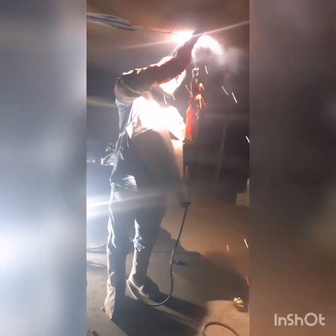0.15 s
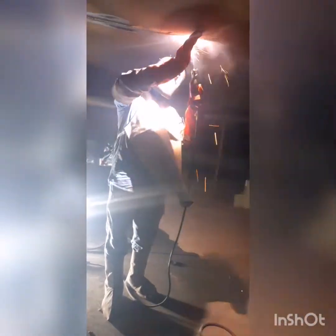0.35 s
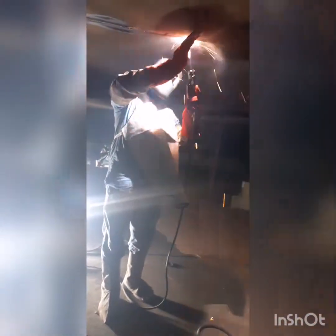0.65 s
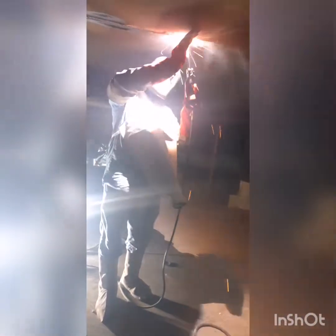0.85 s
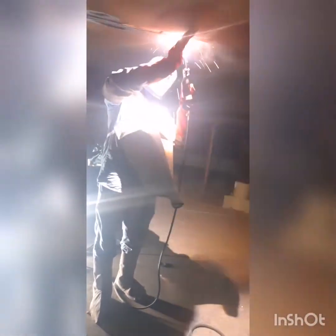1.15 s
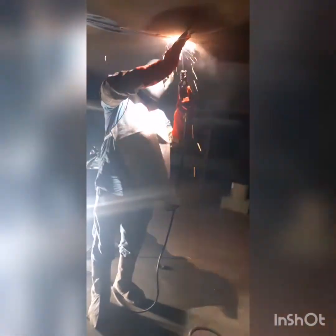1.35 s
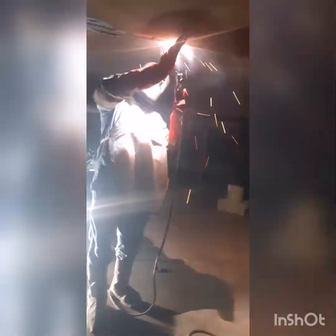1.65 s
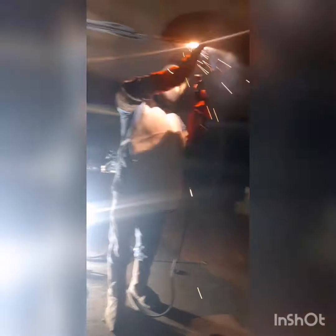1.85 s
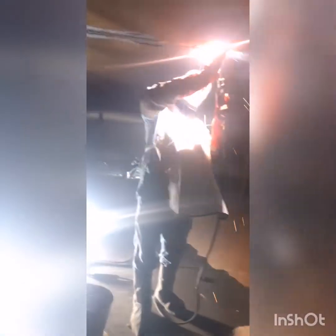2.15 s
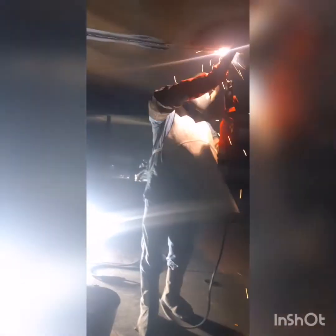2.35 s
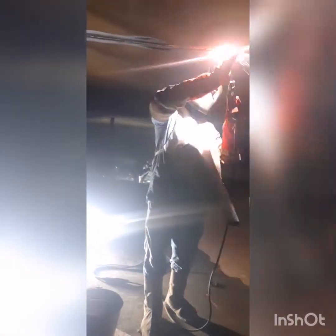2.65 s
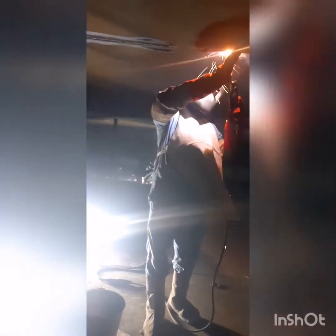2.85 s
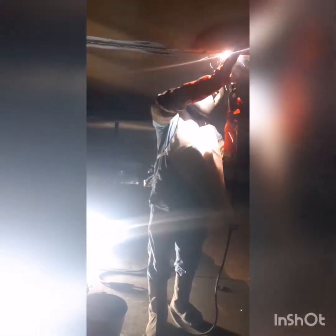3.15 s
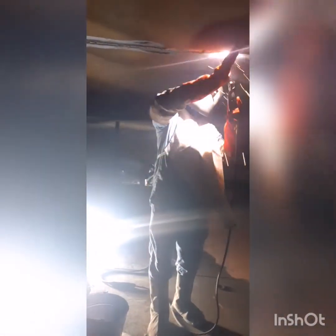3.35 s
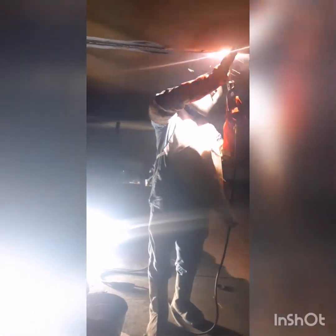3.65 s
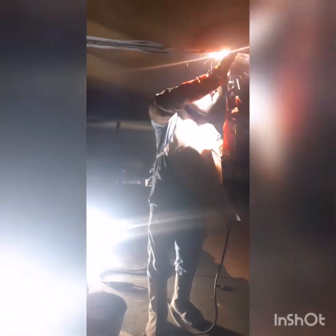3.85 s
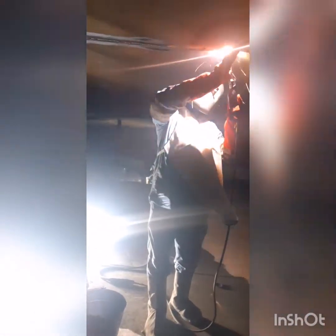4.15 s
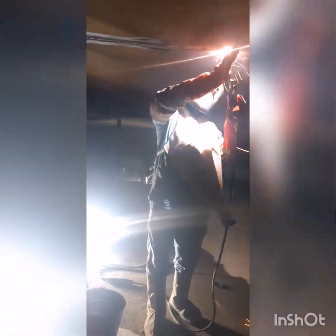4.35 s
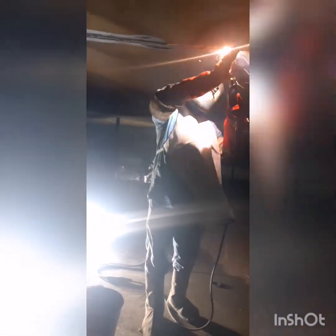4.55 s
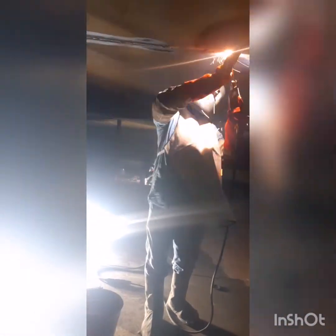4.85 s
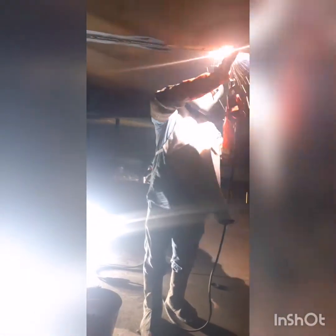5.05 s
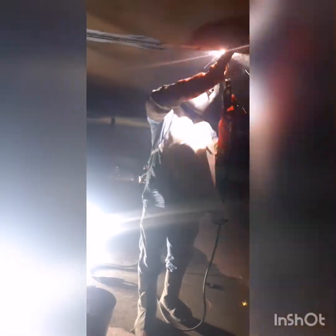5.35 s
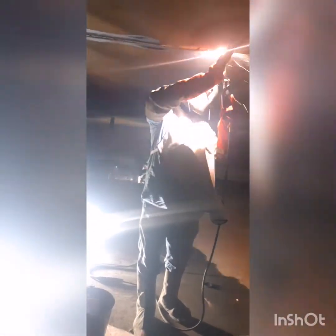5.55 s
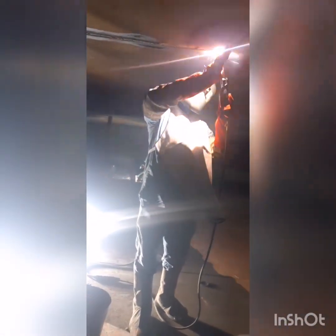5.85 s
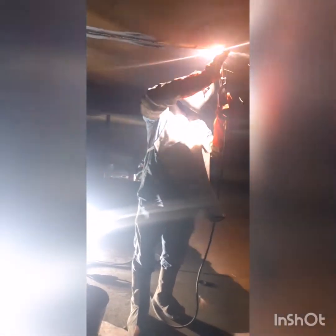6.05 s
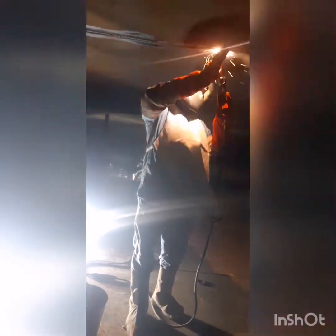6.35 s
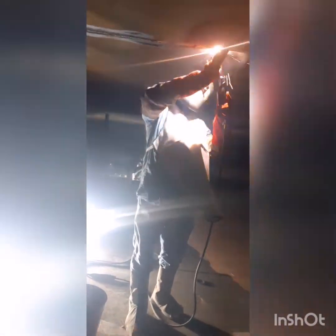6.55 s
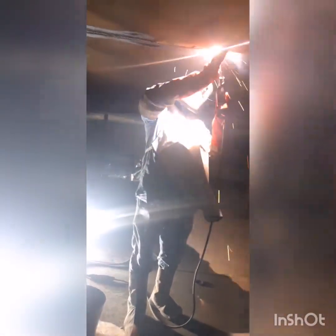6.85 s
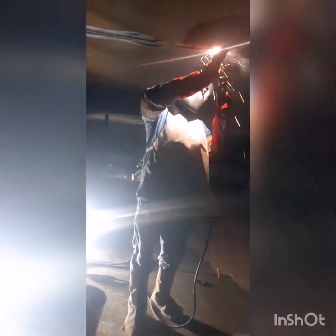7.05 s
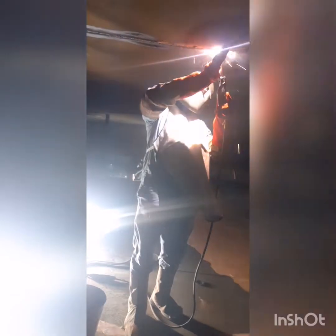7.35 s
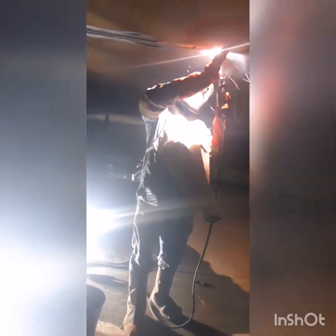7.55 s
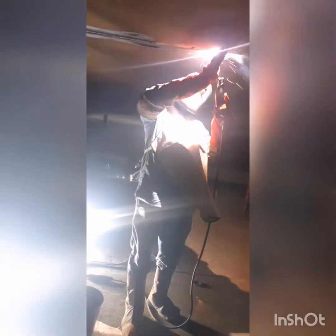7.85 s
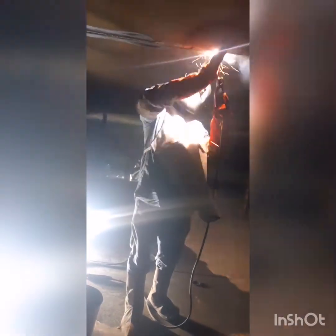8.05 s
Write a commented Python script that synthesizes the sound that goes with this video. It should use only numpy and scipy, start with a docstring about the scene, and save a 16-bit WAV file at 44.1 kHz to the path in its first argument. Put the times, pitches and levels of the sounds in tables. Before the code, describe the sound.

A welding arc burns without pause for about 8.2 seconds in a reverberant steel compartment. From 0 to 1.7 s it fries steadily, random crackles centred in the mids with moderate hiss and fine fizz, over hollow low boom, rumble and a wavering machine hum and drone. Around 1.75 to 2.1 s it flares, hiss surging with sharp spits, then eases. At 2.6 to 2.8 s more spits and a piercing edge lead into strong, bright hissing until about 6 s, while the low boom recedes. Pronounced spits strike near 4.56, 4.93, 5.46 and 5.73 s. After 6.1 s the hiss shrinks, leaving thinner crackling with brief flares. Tiny high whistling squeaks chirp faintly at 6.87 s, then more clearly near 7.25, 7.55 and 7.9 s, as boom and drone return slightly. Droplet pops scatter throughout; the stereo image is close yet diffuse.

```python
"""A welding arc fries in a steel compartment: random pressure snaps, echoed by the walls and coloured.
Its gas jet is denser snaps, hissing up as the arc is drawn out; fine fizz and droplet pops join in.
Bursting drops spit as noise puffs; the molten pool squeaks as short whistles over noisy partials.
Noise through low resonances makes the steel boom, over rumble and air; wavering sines are a machine.
Two closely spaced microphones hear it, mostly as a diffuse wash."""
import sys
import numpy as np
from scipy import signal
from scipy.fft import rfft, irfft, next_fast_len
from scipy.io import wavfile
from scipy.ndimage import uniform_filter1d, map_coordinates

SR = 44100
rng = np.random.default_rng(int(sys.argv[2]) if len(sys.argv) > 2 else 0)


def write(x):
    x = np.atleast_2d(x).T
    wavfile.write(sys.argv[1], SR, np.round(np.clip(x, -1, 1) * 32767).astype(np.int16))

N = 362061

# Half widths are where a resonance's gain has halved. Levels are relative: sources add offsets.
# molten pool: start_s, frying_level_db
POOL_LEVEL = [(0.0, -30), (1.6, -28), (1.85, -27.5), (2.2, -29), (2.6, -30.5), (2.75, -30), (3.2, -32),
              (3.65, -33), (4.1, -34.5), (4.46, -31.5), (4.55, -31.5), (5.1, -31.5), (5.7, -29.5),
              (6.2, -34), (6.36, -31), (6.55, -33.5), (7.0, -34.5), (7.9, -30.5), (8.21, -31)]
# frying spectrum: freq_hz, density_db
FRYING_SPECTRUM = [(300, -26), (600, -11), (900, -9), (1130, 0.5), (1400, -1), (1700, -1), (2100, -5),
                   (2700, -9), (4000, -9.5), (7400, -18), (9000, -22.5)]
# gas jet, grows as the arc is drawn out, sinks as it is shortened: start_s, level_db
JET_LEVEL = [(0, -23.5), (1.15, -24), (1.74, -21.5), (1.98, -18), (2.17, -21), (2.62, -21.5), (2.82, -15),
             (3.35, -16), (3.7, -17), (4.03, -15.5), (4.5, -17), (4.75, -15.5), (4.88, -17), (5.05, -16),
             (5.45, -16), (5.8, -17), (6.1, -20.5), (6.36, -20.5), (6.52, -24.5), (6.75, -28.5), (7.1, -30),
             (7.65, -25.5), (8.21, -25.5)]
# jet spectrum: freq_hz, density_db
JET_SPECTRUM = [(700, -40), (1400, -7.5), (2000, -6), (2600, -4), (3400, -0.5), (4350, -1), (5300, -1),
                (6300, -2), (7300, -3.2), (8000, -7), (8800, -13), (11000, -14.5), (15700, -33)]
# fine spark fizz, choked while the arc is short: start_s, level_db
FIZZ_LEVEL = [(0, -23), (1.2, -23.5), (1.95, -20.5), (2.2, -24), (2.6, -22), (2.85, -20), (4.0, -19.5),
              (4.45, -23), (4.92, -24.5), (5.1, -19.5), (5.8, -21.5), (6.08, -25), (6.3, -20), (6.5, -29),
              (7.12, -27.5), (7.45, -25.8), (8.21, -23)]
# fizz spectrum: freq_hz, density_db
FIZZ_SPECTRUM = [(2000, -18), (5000, -1.5), (7500, 1.5), (8700, -3), (9600, -3), (10700, 1), (12200, 0.5),
                 (14000, -1), (15700, -4)]
# sudden flare-ups: start_s, release_after_s, jet_lift_db, fizz_lift_db
FLARES = [(0.588, 0.11, 2.5, 0), (1.75, .05, 4, 1), (1.877, 0.12, 1, 2.5), (2.633, 0.15, 0, 5),
          (3.03, 0.2, 0.5, 0.5), (3.44, 0.11, 2, 0.5), (3.683, 0.035, 0.5, -2), (4.549, 0.26, 1, 3.5),
          (4.998, 0.22, 2, -1), (5.562, 0.24, 1, .7), (5.882, 0.031, 2.5, 4), (6.267, .1, 1.2, 0),
          (6.865, .03, 4.5, 5.5), (7.213, 0.11, 2, 4), (7.523, 0.067, 1.5, 5), (7.86, 0.075, 2.5, 4)]
# hiss bands that stand out by turns: centre_hz, half_width_hz
JET_BANDS = [(2900, 1100), (4400, 510), (7080, 300)]
# band levels against the jet: start_s, hollow_db, bright_db, piercing_db
JET_BAND_LEVELS = [(0, -5.5, -7, -24), (.65, -2, -11, -24), (1.6, -7, -20, -24), (1.88, -9, -13, -24),
                   (1.985, 2, -9, -22), (2.06, -2, -11, -22), (2.2, -12, -11, -24), (2.62, -14, -16, -22),
                   (2.69, -16, -12, -5), (2.78, -9, -7, -9), (2.95, -4.5, -11, -20), (3.25, -6, -8, -22),
                   (3.5, -11, -8, -22), (3.7, -9, -11, -22), (4.35, -11, -8, -16), (4.75, -7, -17, -13),
                   (4.93, -11, -5, -24), (5.1, -14, -8, -9), (5.3, -13, -9, -18), (5.7, -12, -4, -22),
                   (6.15, -19, -16, -15), (7.47, -8, -15, -24), (7.495, 4.5, -16, -24),
                   (7.65, -10.5, -22, -24), (8.21, -14, -20, -24)]
# steel plate resonances: centre_hz, half_width_hz, lift_db (width is of the dB curve)
PLATE_MODES = [(1334, 27, 3), (2120, 6.5, 1.5), (2600, 31, 2), (2990, 18, 2.5), (3960, 19, 3.5),
               (4200, 8.3, 6), (4700, 11, 2.5), (7050, 82, 0), (7830, 14, 0.5)]
# stereo difference; standing waves reach both microphones alike: freq_hz, side_gain_db
SIDE_SPECTRUM = [(30, 12), (80, 6), (150, -8), (300, -6), (600, -1), (1000, 0)]
# compartment resonances: centre_hz, half_width_hz, level_db
HOLLOW_MODES = [(252.3, 18.8, 3), (280, 32, -3.5), (352.5, 20.7, 0), (654, 59, -8.5), (683, 22, 1.5),
                (1314, 30, -0.5)]
# ringing of the hollow: start_s, level_db
BOOM_LEVEL = [(0, -37), (.12, -32), (.42, -34), (.53, -34), (.7, -31.5), (1.8, -32), (2.22, -34.5),
              (2.6, -33), (3, -43), (3.68, -43), (3.85, -39.5), (5.7, -41), (5.95, -45), (6.6, -40.5),
              (7.3, -39), (7.6, -41), (7.88, -31), (8.21, -37)]
# broad rumble: start_s, level_db
RUMBLE_LEVEL = [(0, -36.5), (.8, -38.5), (1.42, -36), (2.05, -35), (2.3, -37), (2.7, -37.5), (3.1, -44),
                (3.65, -44), (4.1, -47), (4.6, -41.5), (5.45, -41.5), (5.72, -40), (6.15, -45), (6.4, -42),
                (6.7, -43), (7.3, -42.5), (8.05, -40), (8.21, -41)]
# rumble spectrum: freq_hz, density_db
RUMBLE_SPECTRUM = [(60, -21), (90, -19), (125, -5.5), (200, -5), (300, 1.5), (450, -3.5), (650, 1.5),
                   (900, -4.5), (1500, -35)]
# machine hum: start_s, level_db
HUM_LEVEL = [(0, -50), (.22, -44.5), (.45, -56), (.72, -60), (.98, -51), (1.17, -62), (1.33, -39.5),
             (1.48, -46), (1.6, -38.5), (1.78, -35), (1.9, -42), (2.03, -40), (2.2, -47.5), (2.43, -37),
             (2.72, -42), (2.95, -54), (3.45, -51.5), (4.05, -55.5), (4.55, -46), (5.7, -45.5), (5.9, -48),
             (6.3, -46), (6.47, -50), (6.6, -44), (6.77, -54), (6.97, -46), (7.6, -42.5), (7.85, -46),
             (8.21, -41)]
# slow drift of the machine's tones: start_s, hum_hz, lower_drone_hz, upper_drone_hz
MACHINE_PITCH = [(0, 159, 332, 700), (1.3, 158, 335.4, 708), (3.2, 159.5, 330.3, 694),
                 (4.6, 160.6, 340.7, 692.6), (8.21, 163.2, 344, 698)]
# machine drone: start_s, lower_level_db, upper_level_db
DRONE_LEVEL = [(0, -35.5, -35), (.15, -32, -39), (.35, -37, -53), (.8, -35, -35.5), (1.42, -38.5, -33.5),
               (1.7, -33, -43), (2.2, -42, -39), (2.6, -34.5, -49), (3.1, -40.5, -54), (3.65, -49, -55),
               (3.95, -43.5, -48), (4.7, -47, -48), (5.7, -48, -45), (6.6, -49, -44.5), (7.3, -43.5, -40),
               (7.95, -42, -39), (8.21, -39, -36)]
# low rush of air: start_s, level_db
AIR_LEVEL = [(0, -54), (2.2, -51), (3, -56), (4.6, -54), (5.4, -52), (5.9, -58), (7.3, -60), (8.21, -52)]
# air spectrum: freq_hz, density_db
AIR_SPECTRUM = [(20, -16), (50, -6), (90, -2), (130, 6), (400, 0), (1000, -37)]
# bursting metal drops: start_s, level_db
SPITS = [(0.6494, -12), (1.058, -10), (1.7679, -8), (1.9594, -6), (2.0644, -3), (2.6838, -3), (2.7194, -5),
         (2.7694, -9), (3.1602, -7), (3.2106, -8), (3.4484, -7), (4.5634, -1), (4.935, -3), (4.9944, -11),
         (5.251, -8), (5.458, -1), (5.7309, -4), (6.1664, -9), (7.4899, -15), (7.854, -7)]
# gas squeaking out of the pool: start_s, length_s, pitch_hz, whistle_level_db, partials_level_db
SQUEAKS = [(6.874, .016, 7150, -35, -31), (7.227, .008, 6000, -20, -24), (7.241, .004, 4250, -23, -26),
           (7.257, .008, 5880, -19, -22), (7.288, .006, 6080, -23, -27), (7.526, .009, 6000, -26, -32),
           (7.54, 0.012, 6020, -21.5, -22), (7.558, .017, 6020, -21, -23), (7.595, .006, 6080, -22, -26),
           (7.869, .01, 6000, -23, -19), (7.89, .006, 5920, -22, -18), (7.898, .008, 3780, -24, -22),
           (7.911, .007, 6650, -23, -22)]
# partials shared by all squeaks: freq_hz, level_db
SQUEAK_PARTIALS = [(2870, -6), (3600, -2), (4100, -4), (4700, -12), (5300, -1), (5650, -2), (6000, 2),
                   (6700, 0), (7050, -1), (8100, 1), (10700, -5)]

MIC_DELAY_S = .00046  # travel time between the microphones
TOP_HZ = 15760
FLARE_ATTACK_S, FLARE_RELEASE_S = 0.018, .035  # release: time constant
PARTIAL_HALF_WIDTH_HZ, WHISTLE_LINEWIDTH_HZ = 110, 91
SQUEAK_ATTACK_S, SQUEAK_RELEASE_S = .0015, .003  # release: time constant
SQUEAK_ECHO_DB, SQUEAK_ECHO_T60_S = -11, 0.26


def amp(db):
    """Decibels to gain."""
    return 10 ** (np.asarray(db) / 20)


def unit(x):
    """Scale to rms 1."""
    return x / np.sqrt(np.mean(x ** 2) + 1e-20)


def along(points, hz):
    """(Hz, value) points read on a log axis."""
    point_hz, value = np.transpose(points)
    return np.interp(np.log(hz + 1), np.log(point_hz + 1), value)


def curves(rows):
    """One value per sample for each column after the time."""
    time_s, *columns = np.transpose(rows)
    return [np.interp(np.arange(N) / SR, time_s, column) for column in columns]


def wobble(knots_per_s):
    """Smooth random curve."""
    knots = rng.standard_normal(int(N * knots_per_s / SR) + 4)
    return map_coordinates(knots, [np.arange(N) * knots_per_s / SR])


def filtered(x, response):
    """x times a response of frequency."""
    size = next_fast_len(N + SR // 2)
    return irfft(rfft(x, size) * response(np.fft.rfftfreq(size, 1 / SR)), size)[..., :N]


def coloured(x, spectrum):
    """x shaped by a spectrum that falls away below its first point."""
    return filtered(x, lambda hz: amp(along(spectrum, hz)) * np.minimum(hz / spectrum[0][0], 1) ** 2)


def band(hz, centre_hz, half_width_hz):
    """Gain of one resonance, 1 at its centre."""
    return 1 / (1 + ((hz - centre_hz) / half_width_hz) ** 2)


def narrow(response):
    """Unrelated noise at each microphone through a response; rms 1."""
    return unit(filtered(rng.standard_normal((2, N)), response))


def diffuse(pair):
    """Sound from all sides: microphones agree mainly on waves longer than their spacing."""
    def mid_side_gain(hz):
        alike = .98 * np.sinc(2 * hz * MIC_DELAY_S)
        side_power = amp(along(SIDE_SPECTRUM, hz)) ** 2
        return np.sqrt([1 + alike, (1 - alike) * side_power])

    mid, side = filtered(pair, mid_side_gain)
    return np.array([mid + side, mid - side]) / np.sqrt(2)


def compartment(x, direct_db, tail_db, early_t60_s, tail_t60_s):
    """Reflections turn snaps into dying noise: a flurry off the near plates, then a longer tail."""
    t = np.arange(SR // 2) / SR
    flurry = amp(-60 * t / early_t60_s) ** 2
    tail = amp(-60 * t / tail_t60_s) ** 2
    decay = flurry / flurry.sum() + amp(tail_db) ** 2 * tail / tail.sum()
    power = np.abs(signal.fftconvolve(x ** 2, decay / decay.sum())[:N])
    wet = diffuse(np.sqrt(power) * rng.standard_normal((2, N)))
    lag = int(MIC_DELAY_S * SR * .9)  # the arc is overhead, nearer to one microphone
    direct = np.array([x, np.pad(x, (lag, 0))[:N]])
    return (wet + amp(direct_db) * direct) / np.sqrt(1 + amp(direct_db) ** 2)


def shifting(pair, depth_db, size):
    """Reflections reinforce and cancel frequencies, differently as the welder and hot air move."""
    spectrum = signal.stft(pair, SR, nperseg=1024)[2]
    shared = rng.standard_normal(spectrum.shape[1:])
    chance = shared + .5 * rng.standard_normal(spectrum.shape)
    bins, frames = size
    field = uniform_filter1d(uniform_filter1d(chance, bins, axis=1), frames, axis=2)
    gain = unit(amp(depth_db * unit(field)))
    return signal.istft(spectrum * gain, SR, nperseg=1024)[1][:, :N]


def sparks(rate_per_s, spread_db):
    """Random pressure snaps of scattered but bounded size; rms 1."""
    fires = rng.random(N) < rate_per_s / SR
    size = np.minimum(rng.standard_normal(N), 2)
    return unit(fires * np.sign(rng.standard_normal(N)) * amp(spread_db * size))


def spatter(rate_per_s, pitch_hz, cycles, spread_db):
    """Flying droplets pop all around as decaying sines of scattered pitch and life; rms 1."""
    times = np.flatnonzero(rng.random(N) < rate_per_s / SR)
    pitch, life, size, way = rng.standard_normal((4, len(times), 1))
    hz = pitch_hz * np.exp(np.tanh(.6 * pitch))
    n = np.arange(SR // 80)
    decay = np.exp(-n / SR * hz / (cycles * np.exp(0.58 * life)))
    pops = amp(spread_db * size) * np.sin(2 * np.pi * hz * n / SR) * decay
    lag = np.rint(np.tanh(way) * MIC_DELAY_S * SR / 2).astype(int)

    def heard(side):
        at = np.maximum(times[:, None] + n + side * lag, 0).ravel()
        return np.bincount(at, pops.ravel(), N)[:N]

    pair = np.array([heard(1), heard(-1)])
    return unit(filtered(pair, lambda f: np.minimum(f / 2000, 1) ** 3))  # small drops make no bass


def arc(jet_db, fizz_db):
    """Pool fries, gas hisses, droplets pop, sparks fizz; snaps flutter as drops cross the gap."""
    frying_db, = curves(POOL_LEVEL)
    flutter = wobble(90)
    snaps = sparks(rate_per_s=1600, spread_db=3) * amp(0.43 * flutter)
    frying = compartment(snaps, direct_db=-7.5, tail_db=0, early_t60_s=0.05, tail_t60_s=0.42)
    frying = shifting(frying, depth_db=1.36, size=(4, 3))
    gas = sparks(rate_per_s=12000, spread_db=3.5) * amp(0.45 * flutter + 1.7 * wobble(200))
    jet = compartment(gas, direct_db=-8.5, tail_db=8, early_t60_s=0.02, tail_t60_s=0.21)
    jet = shifting(jet, depth_db=2, size=(18, 2))
    ticks = sparks(rate_per_s=8000, spread_db=3) * amp(0.2 * flutter)
    fizz = compartment(ticks, direct_db=-16, tail_db=-9, early_t60_s=0.027, tail_t60_s=0.18)
    pops = spatter(rate_per_s=550, pitch_hz=3707, cycles=16.5, spread_db=3.0)
    return (amp(frying_db + 8.5) * unit(coloured(frying, FRYING_SPECTRUM))
            + amp(jet_db + 1.0) * unit(coloured(jet, JET_SPECTRUM))
            + amp((jet_db + frying_db) / 2 - 2.5) * pops
            + amp(fizz_db) * unit(coloured(fizz, FIZZ_SPECTRUM)))


def jet_ring(jet_db):
    """Hollow, bright and piercing noise bands of the jet stand out by turns and flicker."""
    out = np.zeros((2, N))
    for (hz, half_width_hz), band_db in zip(JET_BANDS, curves(JET_BAND_LEVELS)):
        hiss = narrow(lambda f: band(f, hz, half_width_hz) * np.minimum(f / 2100, 1) ** 4)
        out += amp(jet_db + band_db + 2.0 * wobble(35)) * hiss
    return out


def plates(pair):
    """The steel plates favour a few fixed pitches."""
    def lift(f):
        return amp(sum(db * band(f, hz, half_width_hz) for hz, half_width_hz, db in PLATE_MODES))

    return filtered(pair, lift)


def boom():
    """Noise keeps the steel hollow ringing at low resonances, over a broad, lumpy rumble."""
    def modes(f):
        return np.sqrt(sum((amp(db) * band(f, hz, half_width_hz)) ** 2
                           for hz, half_width_hz, db in HOLLOW_MODES))

    boom_db, = curves(BOOM_LEVEL)
    rumble_db, = curves(RUMBLE_LEVEL)
    ring = unit(diffuse(filtered(rng.standard_normal((2, N)), modes)))
    rumble = diffuse(coloured(rng.standard_normal((2, N)), RUMBLE_SPECTRUM))
    rumble = unit(shifting(rumble, depth_db=3.5, size=(3, 7)))
    return amp(boom_db - 1.0 + 1.66 * wobble(10)) * ring + amp(rumble_db + 0.47 * wobble(6.3)) * rumble


def tone(hz):
    """Sine of varying pitch; rms 1."""
    return unit(np.sin(2 * np.pi * np.cumsum(hz) / SR))


def machine():
    """A hum of nearly steady pitch under a two-tone drone that swells and flutters at random."""
    hum_db, = curves(HUM_LEVEL)
    hum_hz, *drone_hz = curves(MACHINE_PITCH)
    out = amp(hum_db - 2.0 + 1.1 * wobble(14)) * tone(hum_hz + 1.12 * wobble(9))
    for hz, db in zip(drone_hz, curves(DRONE_LEVEL)):
        out += amp(db - 4 + 3.6 * wobble(24)) * tone(hz + 7 * wobble(36))
    return out


def air_rush():
    """Low rush of air in the space: diffuse coloured noise."""
    air_db, = curves(AIR_LEVEL)
    air = unit(diffuse(coloured(rng.standard_normal((2, N)), AIR_SPECTRUM)))
    return amp(air_db + 3.9 * wobble(9.9)) * air


def flare(start_s, release_after_s):
    """Attack, hold and release of one flare-up, 0 to 1."""
    t = np.arange(N) / SR - start_s
    release = np.exp(-np.maximum(t - release_after_s, 0) / FLARE_RELEASE_S)
    return np.clip(t / FLARE_ATTACK_S, 0, 1) * release


def arc_levels():
    """Jet and fizz in dB, each briefly shifted by the flare-ups."""
    jet_db, = curves(JET_LEVEL)
    fizz_db, = curves(FIZZ_LEVEL)
    for start_s, release_after_s, jet_lift_db, fizz_lift_db in FLARES:
        shape = flare(start_s, release_after_s)
        jet_db = jet_db + jet_lift_db * shape
        fizz_db = fizz_db + fizz_lift_db * shape
    return jet_db, fizz_db


def spits():
    """Each bursting drop is a short sharp noise puff with the jet's colour."""
    puffs = np.zeros(N + SR)
    t = np.arange(SR // 8) / SR
    for start_s, db in SPITS:
        decay = amp(db + 0.5 - 60 * t / 0.035)  # 60 dB in 35 ms
        puffs[round(start_s * SR):][:len(t)] += decay * rng.standard_normal(len(t))
    echoed = compartment(puffs[:N], direct_db=-20, tail_db=-6, early_t60_s=.018, tail_t60_s=0.37)
    return coloured(echoed, JET_SPECTRUM)


def squeaks():
    """A few milliseconds of phase-wandering whistle over noisy partials, with a short echo."""
    def partial_gain(f):
        return sum(amp(db) * band(f, hz, PARTIAL_HALF_WIDTH_HZ) for hz, db in SQUEAK_PARTIALS)

    out = np.zeros((2, N + SR))
    t = np.arange(SR // 4) / SR
    cluster = narrow(partial_gain)
    phase_step = np.sqrt(2 * np.pi * WHISTLE_LINEWIDTH_HZ / SR)
    for start_s, length_s, pitch_hz, whistle_db, partials_db in SQUEAKS:
        start = round(start_s * SR)
        drift = np.cumsum(rng.standard_normal((2, len(t))), axis=1) * phase_step
        whistle = np.sqrt(2) * np.sin(2 * np.pi * pitch_hz * t + drift)
        after_s = np.maximum(t - length_s, 0)
        release = np.exp(-after_s / SQUEAK_RELEASE_S)
        echo = amp(SQUEAK_ECHO_DB - 60 * after_s / SQUEAK_ECHO_T60_S)
        shape = np.minimum(t / SQUEAK_ATTACK_S, 1) * np.maximum(release, echo)
        partials = np.roll(cluster, -start, axis=1)[:, :len(t)]
        squeak = amp(whistle_db + 0.5) * whistle + amp(partials_db) * partials
        out[:, start:start + len(t)] += shape * squeak
    return out[:, :N]


def scene():
    """Arc and drops, coloured by the walls, with squeaks and the low sounds."""
    jet_db, fizz_db = arc_levels()
    welding = plates(arc(jet_db, fizz_db) + jet_ring(jet_db) + spits())
    welding = shifting(welding, depth_db=2.5, size=(2, 10))
    return welding + squeaks() + boom() + machine() + air_rush()


def record(dry):
    """Round off the highest peaks, then cut all above the band limit."""
    rounded = dry / (1 + np.abs(dry) ** 8) ** (1 / 8)
    return filtered(rounded, lambda hz: hz < TOP_HZ)


dry = scene()
out = record(dry)
write(out)
```